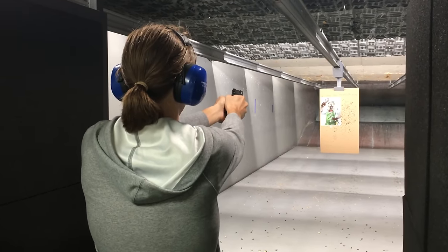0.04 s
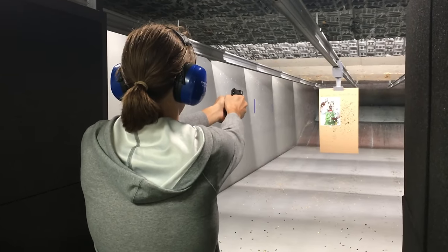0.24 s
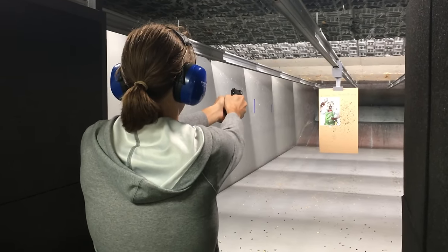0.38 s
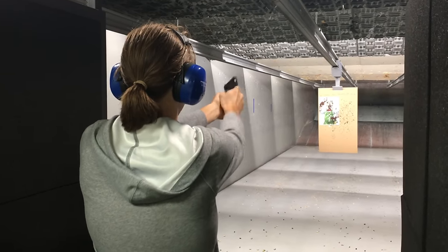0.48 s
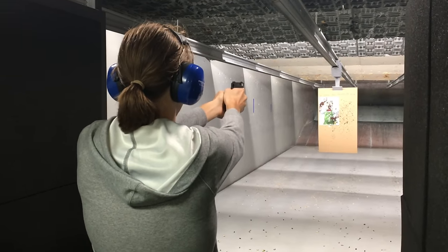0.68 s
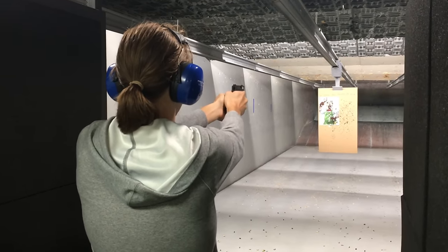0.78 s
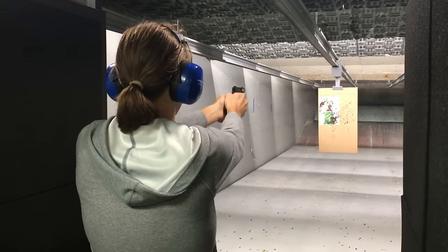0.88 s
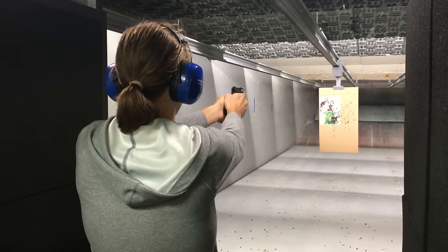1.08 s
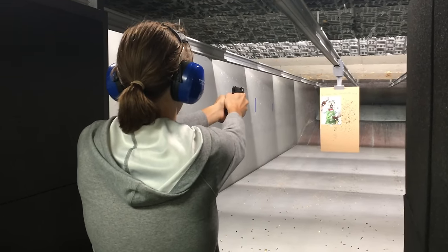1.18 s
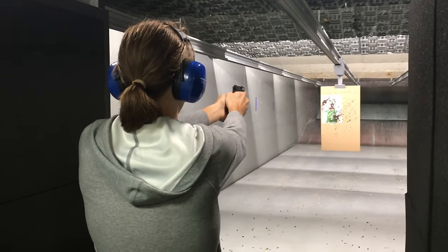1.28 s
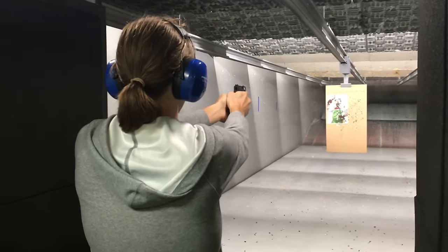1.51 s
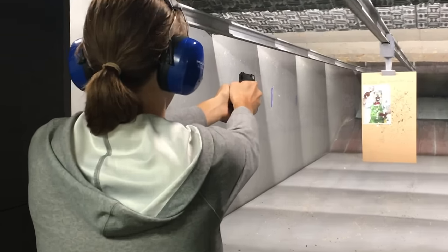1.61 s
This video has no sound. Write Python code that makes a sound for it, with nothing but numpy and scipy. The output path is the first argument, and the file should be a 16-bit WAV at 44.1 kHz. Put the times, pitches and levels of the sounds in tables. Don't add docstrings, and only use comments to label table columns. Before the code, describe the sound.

One pistol shot in an indoor range, close to a small overloading microphone; steady fan rumble comes first, then the blast, clumped echoes, a fading tail and a tiny brass case tinkling on the floor.

```python
import sys
import numpy as np
from scipy import signal
from scipy.io import wavfile
from scipy.ndimage import uniform_filter1d

SR = 44100
rng = np.random.default_rng(int(sys.argv[2]) if len(sys.argv) > 2 else 0)


def gain_from_db(level_db):
    decades = np.asarray(level_db, float) / 20
    return 10 ** decades


def generate_wav(sig):
    pcm = np.round(np.clip(np.atleast_2d(sig).T, -1, 1) * 32767).astype(np.int16)
    wavfile.write(sys.argv[1], SR, pcm)


N = 72765


def evened(x):
    return x / np.sqrt(np.mean(x ** 2) + 1e-20)


def read(points, hz):
    f, value = np.transpose(points)
    return np.interp(np.log(hz + 1), np.log(f + 1), value)


def add(mix, s, sound):
    part = mix[round(s * SR):][:len(sound)]
    part += sound[:len(part)]


def colour(x, points):
    hz = abs(np.fft.fftfreq(4096, 1 / SR))
    log_gain = np.log(gain_from_db(np.maximum(read(points, hz), -100)))
    taps = np.fft.ifft(np.exp(np.conj(signal.hilbert(log_gain)))).real[:2048]
    return signal.oaconvolve(x, taps)[:len(x)]


def resonate(x, hz, width):
    turn = np.exp(2j * np.pi * hz * np.arange(len(x)) / SR)
    r = np.exp(-np.pi * width / SR)
    return 2 * (turn * signal.lfilter([1 - r], [1, -r], x / turn)).real


def field(shape_db, patch_db, size):
    hop = size // 4
    frames = N // hop + 5
    hz = np.fft.rfftfreq(size, 1 / SR)[:, None]
    a, b, patches = rng.standard_normal((frames, len(hz), 3)).T
    patches = uniform_filter1d(patches, 5, 0)
    patches = evened(uniform_filter1d(patches, 8, 1))
    level_db = shape_db(hz, np.arange(frames) * hop / SR) + patch_db * patches
    z = (a + 1j * b) * gain_from_db(level_db)
    return signal.istft(z, nperseg=size, noverlap=size - hop)[1][:N]


# (time
# [s], level [dB], T60 [s], brightness [0-1], booth ring [Hz])
CLUMPS = [
    (.455, -25, .3, .015, 1500),
    (.4605, -19, .25, .03, 1200),
          (.4655, -7, 0.16, 0.1, 389), (.475, -9, 0.13, 0.22, 1443), (0.5, -7.5, 0.12, 0.002, 740),
               (0.505, -3.5, 0.085, 0.002, 970), (0.5102, -7.5, 0.22, 0.95, 1275),
               (.524, -18.5, 0.47, 0.3, 520), (.540, -18, 0.22, 0.93, 378), (.551, -21, 0.28, 0.86, 245),
               (.565, -17.5, 0.34, 0.67, 995), (.604, -21, 0.037, 0.01, 334), (0.615, -24, 0.032, 0, 417),
               (0.635, -23, 0.22, 1, 1030), (.638, -14.5, 0.065, 0, 1050),
               (0.6497, -20.5, 0.029, 0.5, 1000), (0.656, -22.5, .22, 1, 1080),
               (0.735, -30.5, .1, .02, 1010), (.760, -23.5, .12, 0, 850), (.804, -25, .08, 0, 1160)]
# (frequency [Hz], density [dB per Hz])
THUD_SPECTRUM = [(60, -14.5), (200, -2.5), (1290, -5.5), (2980, -14), (3700, -19), (8000, -30.5),
                 (11000, -42.5), (15500, -46)]
# (frequency [Hz], density [dB per Hz])
CRACK_SPECTRUM = [(60, -11.5), (250, -0.5), (1260, -6), (2900, -16), (3600, -10.5), (4740, -16),
                  (9080, -16), (15500, -26.5)]


def blast():
    echoes_per_s, spread_db = 9000, 2.5
    rise_s, lead_db = 0.0007, 10.5
    front_db, front_s = 6.5, 0.0042
    treble_fade_db_per_s = 148
    ring_db, ring_q = -5, 7.1
    out = np.zeros(N)
    t = np.arange(SR // 3) / SR
    for s, db, t60, bright, ring_hz in CLUMPS:
        chance, size, sign = rng.random((len(t), 3)).T
        present = chance < echoes_per_s / SR
        swarm = present * gain_from_db(-spread_db * np.log(size + 0.00033)) * np.sign(sign - 0.5)
        swarm[round(rise_s * SR)] = gain_from_db(lead_db) * bright ** 2

        thud = evened(colour(swarm, THUD_SPECTRUM))
        crack_db = front_db * np.exp(-t / front_s) - (1 - bright) * treble_fade_db_per_s * t
        crack = evened(colour(swarm, CRACK_SPECTRUM)) * gain_from_db(crack_db)
        width = ring_hz / ring_q
        ring = evened(resonate(resonate(swarm, ring_hz, width), ring_hz, width))

        clump = np.sqrt(1 - bright) * thud + np.sqrt(bright) * crack + gain_from_db(ring_db) * ring
        envelope = np.minimum(t / rise_s, 1) * gain_from_db(db - 60 * t / t60)
        add(out, s, evened(clump) * envelope)
    return out


def boom():
    start_s, level_db = 0.5285, -7.5
    pitch_hz, sag = 89, 0.34
    rise_s, fall_s = 0.021, 0.027
    out = np.zeros(N)
    t = np.arange(SR // 5) / SR
    rise = np.minimum(t / rise_s, 1)
    hz = pitch_hz * (1 - sag * rise)
    fall = np.exp(-(np.maximum(t - rise_s, 0) / fall_s) ** 2)
    swing = np.sin(2 * np.pi * np.cumsum(hz) / SR)
    add(out, start_s, gain_from_db(level_db) * rise ** 0.5 * fall * swing)
    return out


# (time [s], gain [dB])
GAIN_CONTROL = [
    (0, -1),
    (.46, -0.5),
    (.5, -44),
    (.7, -33.5),
    (1.0, -30),
    (1.28, -25),
    (1.4, -18),
    (1.65, -6.5),
]


def duck_db(t):
    return np.interp(t, *np.transpose(GAIN_CONTROL))


# (frequency [Hz], density [dB per Hz])
TAIL_SPECTRUM = [(35, -45), (80, -0.5), (420, -9.5), (700, -4.5), (1150, -3), (1600, -9.5), (2400, -18),
                 (5700, -26.5), (15500, -54)]
# (frequency [Hz], T60 [s])
LANE_T60 = [(60, 1.8), (300, 1.08), (450, 0.88), (700, 1.377), (1600, 1.38), (2500, 1.26), (5000, 0.9),
            (9000, 0.69), (15000, 0.28)]


def tail(start, rise, db, stretch, tilt_db=0):
    t = np.arange(N) / SR

    def dying_db(hz, s):
        tilt = tilt_db * np.log2(hz / 1000 + 0.05)
        since_peak = np.maximum(s - start - rise, 0)
        return read(TAIL_SPECTRUM, hz) + tilt - 60 * since_peak / (stretch * read(LANE_T60, hz))

    sound = field(dying_db, patch_db=1.5, size=512)
    sound = sound / np.std(sound[:round(start * SR)])
    lift = gain_from_db(0.65 * (duck_db(t) - duck_db(start + rise)))
    return gain_from_db(db) * np.clip((t - start) / rise, 0, 1) * lift * sound


# (time [s], tick level [dB], ring share [ratio])
CASE_HITS = [
    (.793, -60, 0.05),
    (1.317, -51.5, .3),
    (1.323, -48.5, 2),
]
# (frequency [Hz], level re tick [dB], T60 [s])
CASE_MODES = [(11100, -19, 0.22), (10890, -13, 0.29), (11120, -14.5, 0.41), (11150, -13, 0.44),
              (5520, -18, 0.043), (6200, -20, 0.026)]
# (frequency [Hz], density [dB per Hz])
TICK_SPECTRUM = [(2000, -39), (5000, 0), (6000, 1), (9000, -5), (12000, -8), (15500, -12)]


def case():
    out = np.zeros(N)
    t = np.arange(SR // 3) / SR
    for s, db, ring_share in CASE_HITS:
        tick = evened(colour(rng.standard_normal(len(t)), TICK_SPECTRUM)) * gain_from_db(-60 * t / 0.03)
        ring = np.zeros(len(t))
        for hz, mode_db, t60 in CASE_MODES:
            ring += gain_from_db(mode_db - 60 * t / t60) * np.sin(2 * np.pi * hz * t)
        add(out, s, gain_from_db(db) * (tick + ring_share * ring))
    return out


# (frequency [Hz], density [dB per Hz])
RUMBLE_SPECTRUM = [(12, -39), (20, -3), (48, -2), (103, -4), (168, -21), (211, -14), (300, -22), (343, -23),
                   (500, -48), (650, -62), (1100, -120)]
# (frequency [Hz], width [Hz], level re rumble [dB])
BLOWER_ORDERS = [(58.6, 14, -3), (110.7, 33, -5.5)]
# (time [s], gain [dB])
RUMBLE_GAIN = [(0, -0.5), (.44, 1.5), (.5, 0), (.62, -12), (.7, -23), (.8, -14), (.95, -16), (1.1, -16),
               (1.3, -15.5), (1.42, -14.5), (1.52, -9.5), (1.65, -6)]
# (frequency [Hz], density [dB per Hz])
HISS_SPECTRUM = [(350, -5), (950, -8), (1300, -9.5), (2700, -17), (3400, -12.5), (4600, -18), (6400, -17.5),
                 (15600, -34.5)]


def fans():
    rumble_db, hiss_db = -24, -43
    t = np.arange(N) / SR
    rumble = evened(field(lambda hz, s: read(RUMBLE_SPECTRUM, hz), patch_db=1.5, size=2048))
    for hz, width, db in BLOWER_ORDERS:
        order = resonate(resonate(rng.standard_normal(N), hz, width), hz, width)
        rumble += gain_from_db(db) * evened(order)
    hiss = evened(field(lambda hz, s: read(HISS_SPECTRUM, hz), patch_db=1.2, size=512))
    rumble_gain_db = np.interp(t, *np.transpose(RUMBLE_GAIN))
    return evened(rumble) * gain_from_db(rumble_db + rumble_gain_db) + hiss * gain_from_db(hiss_db + duck_db(t))


def scene():
    far_return = tail(start=0.704, rise=0.046, db=-19, stretch=0.96)
    near_walls = tail(start=0.541, rise=0.033, db=-27, stretch=0.72, tilt_db=5)
    mono = blast() + boom() + far_return + near_walls + case() + fans()
    return np.tile(mono, (2, 1))


def low_pass(x):
    return signal.sosfilt(signal.butter(12, 15760, fs=SR, output="sos"), x)


# (frequency [Hz], density [dB per Hz])
SIDE_SPECTRUM = [(200, -15), (500, 6.5), (1900, -1), (3200, -10.5), (15000, -24.5)]


def record(dry):
    clip_db, knee = -0.7, 3.0
    side_db, side_until_s = -23, 0.4726
    bass_cut = signal.butter(4, 41, "high", fs=SR, output="sos")
    cut = signal.sosfilt(bass_cut, dry)
    held = cut / (1 + abs(cut / gain_from_db(clip_db)) ** knee) ** (1 / knee)

    side_cut = signal.butter(2, 300, "high", fs=SR, output="sos")
    loudness = uniform_filter1d(abs(signal.sosfilt(side_cut, held[0])), size=90)
    noise = evened(colour(rng.standard_normal(N), SIDE_SPECTRUM))
    side_fade = np.clip((side_until_s - np.arange(N) / SR) / 0.008, 0, 1)
    apart = gain_from_db(side_db) * loudness * noise * side_fade

    self_noise = gain_from_db(-84) * rng.standard_normal(N)
    stereo = held + self_noise + np.array([apart, -apart])
    band_limit = signal.firwin(511, 15760, window=("kaiser", 9), fs=SR)
    finished = signal.oaconvolve(stereo, band_limit[None], "same")
    return low_pass(finished)


dry = scene()
out = record(dry)
generate_wav(out)
```